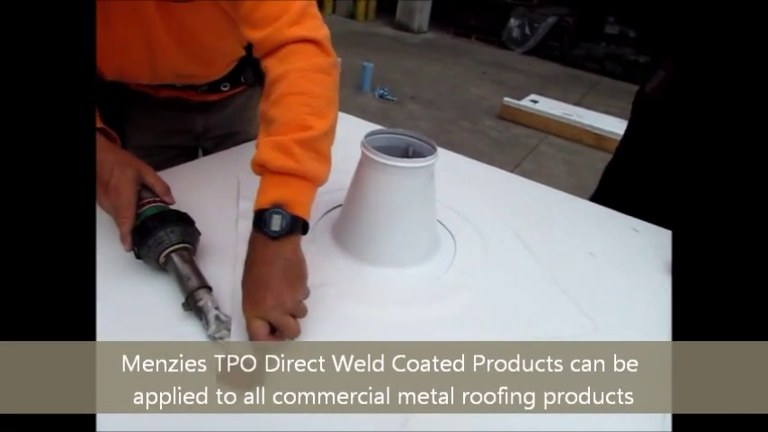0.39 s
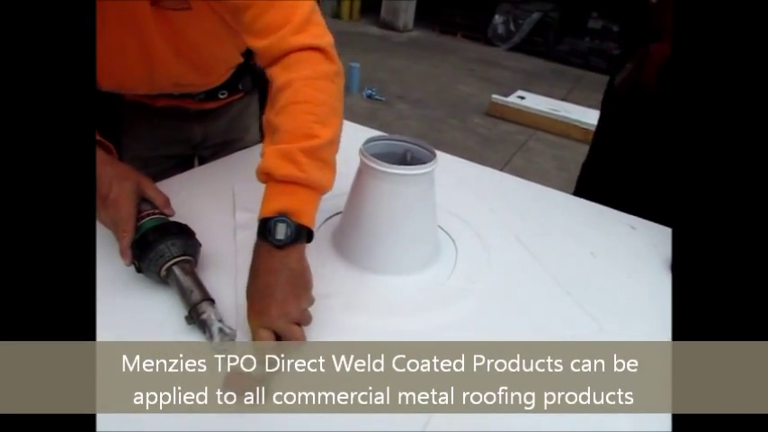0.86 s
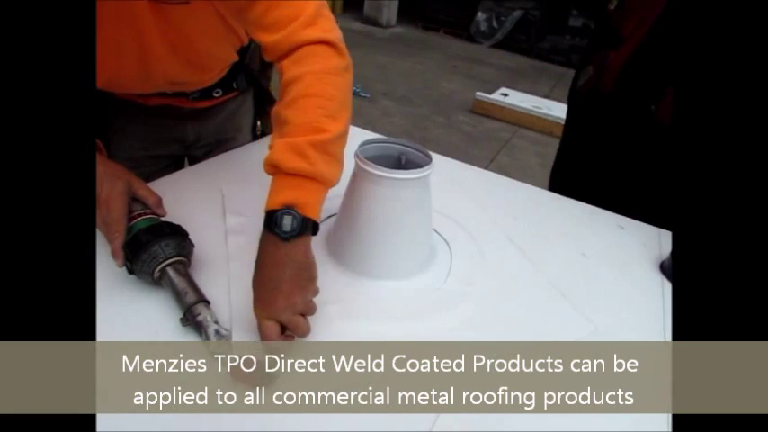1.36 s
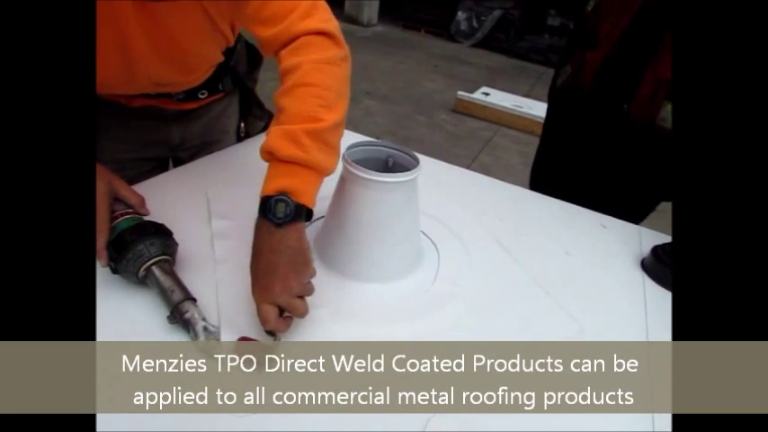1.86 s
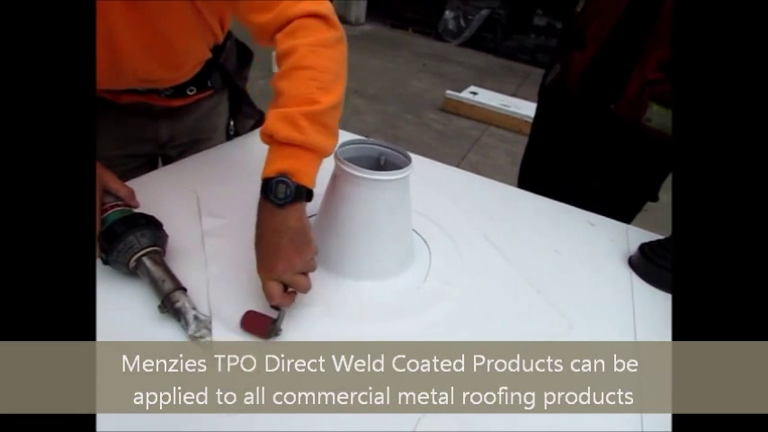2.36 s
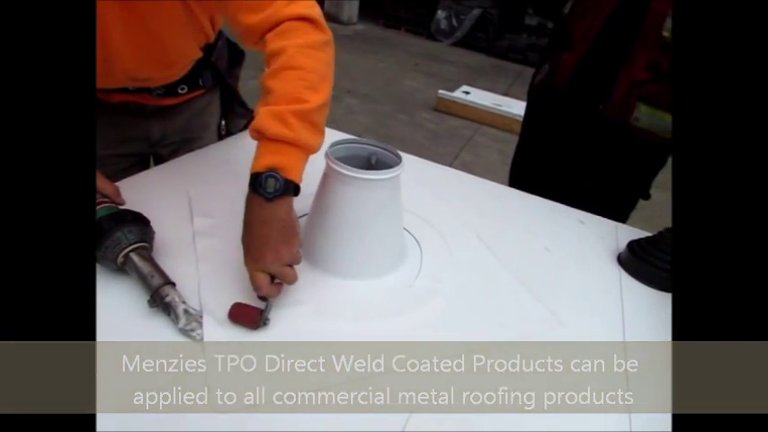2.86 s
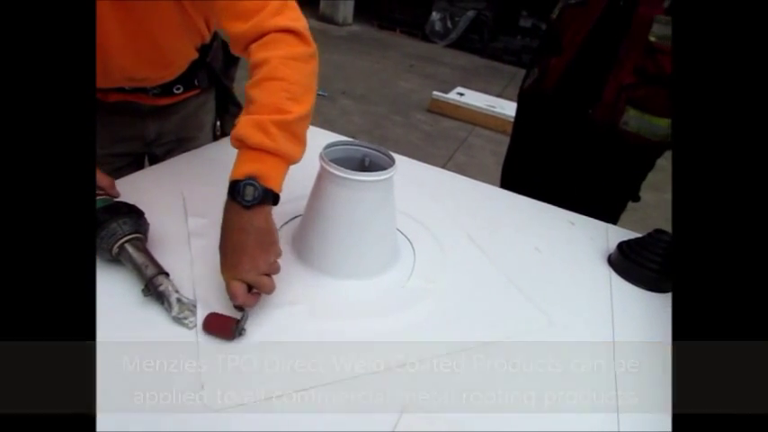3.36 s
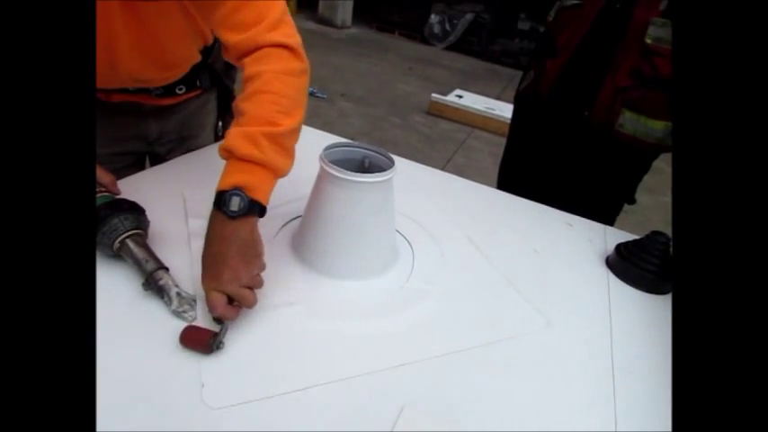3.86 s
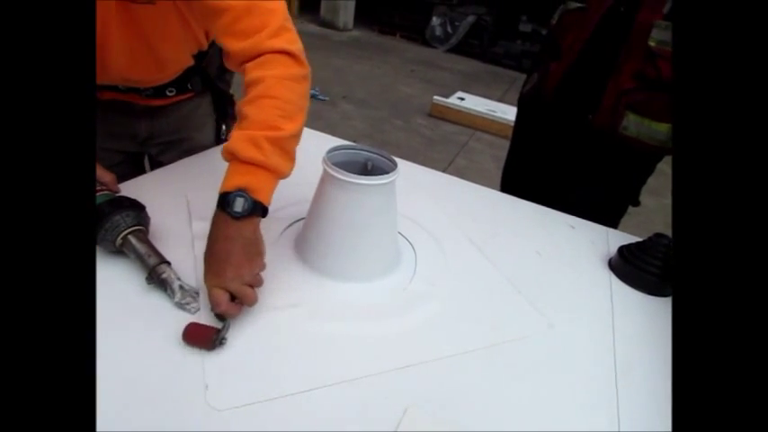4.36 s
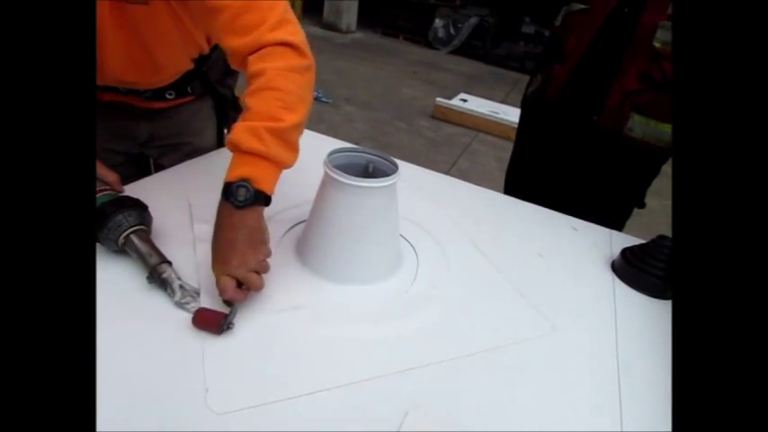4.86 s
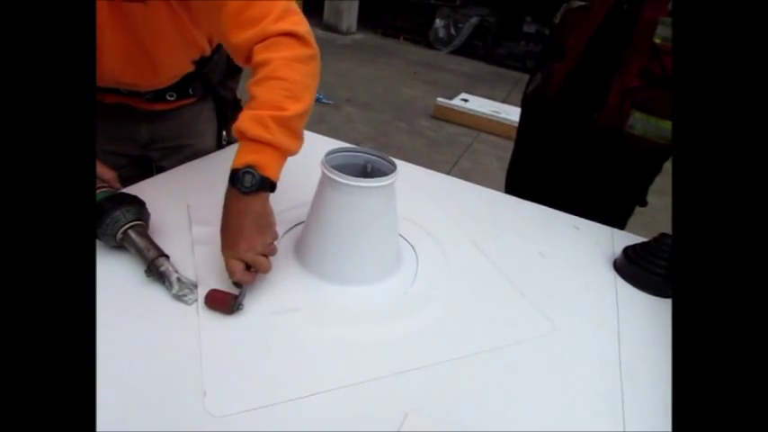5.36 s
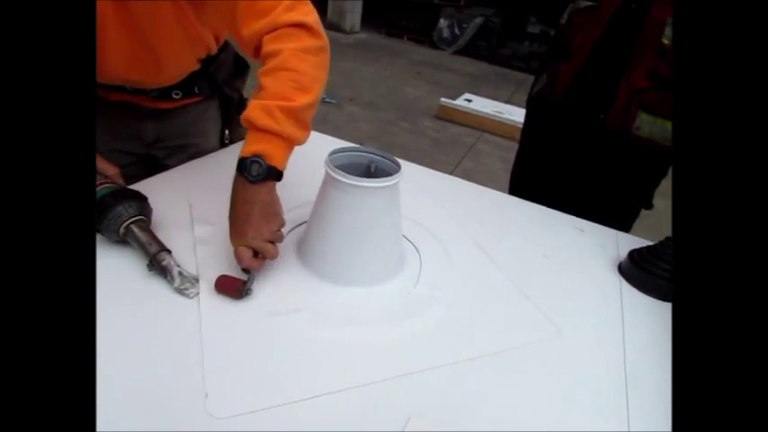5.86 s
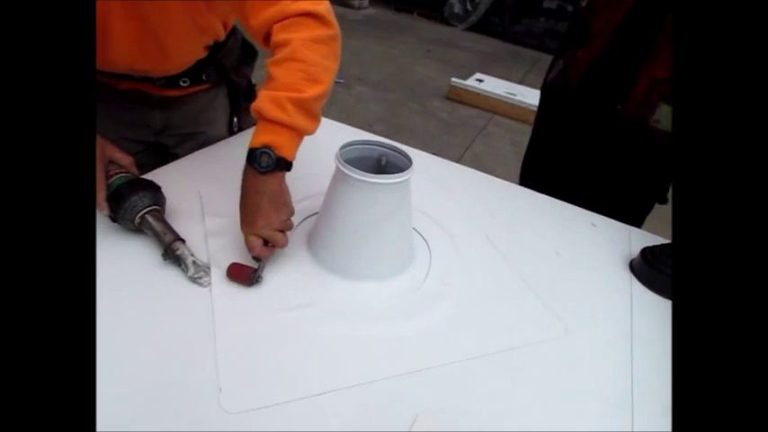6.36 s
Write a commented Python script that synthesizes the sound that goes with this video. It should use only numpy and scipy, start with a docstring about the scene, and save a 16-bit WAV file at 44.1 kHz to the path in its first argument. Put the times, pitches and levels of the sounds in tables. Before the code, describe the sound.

A steady jet of hot air hisses brightly at close range, coloured by its nozzle and flickering in width between left and right. Small irregular puffs of duller air swell and fall. Underneath sit a thin, gently sagging motor hum, low yard rumble and a far-off throbbing engine, strongest just after the middle, then fading.

```python
"""Hot-air welder on roofing membrane

A hand-held welder blows close to two microphone ports: noise shaped by nozzle resonances makes its hiss,
a duller noise its fan rush, and sines its motor, which sags each time the heater cuts in.
Noise bands and a throbbing low tone carry a distant vehicle past, over rumble and faint hums of the yard."""
import sys
import numpy as np
from scipy import signal
from scipy.io import wavfile
from scipy.ndimage import uniform_filter1d

SR = 44100
rng = np.random.default_rng(int(sys.argv[2]) if len(sys.argv) > 2 else 0)


def invert_db(x):
    """Field ratio 10**(x/20) for x, a level in decibels (scalar or array-like)."""
    u = np.asarray(x, float) / 20
    return 10 ** u


def dump(signal):
    """Clip the signal to [-1, 1] and save it as 16-bit WAV at the path in sys.argv[1]."""
    limited = np.clip(np.atleast_2d(signal).T, -1, 1)
    pcm = np.round(limited * 32767).astype(np.int16)
    wavfile.write(sys.argv[1], SR, pcm)


N = 297234  # length in samples


def evened(x):
    """Scales a signal to rms 1."""
    return x / np.sqrt(np.mean(x ** 2) + 1e-20)


def read(points, hz):
    """Reads every column of a table on a log-frequency axis."""
    f, *columns = np.transpose(points)
    return [np.interp(np.log(hz + 1), np.log(f + 1), c) for c in columns]


def follow(rows, t):
    """Reads every column of a table along time."""
    s, *columns = np.transpose(rows)
    return [np.interp(t, s, c) for c in columns]


def hump(hz, centre_hz, width_hz):
    """Power of a steep resonance, down to a quarter at half a width from its centre."""
    return 1 / (1 + (2 * (hz - centre_hz) / width_hz) ** 2) ** 2


def shaped(colour_power):
    """Scales a spectrum to total power 1."""
    return colour_power / colour_power.sum()


def swell(t, centre_s, length_s):
    """A smooth bump of height 1."""
    return np.exp(-(2 * (t - centre_s) / length_s) ** 2)


def wander(top_hz):
    """Slow random drift of rms 1, from sines between 0.3 Hz and top_hz."""
    t = np.arange(0, N + 64, 64) / SR
    rates_hz = np.geomspace(.3, top_hz, 24)
    slow = sum(np.sin(2 * np.pi * (f * t + rng.random())) / np.sqrt(f) for f in rates_hz)
    return np.interp(np.arange(N) / SR, t, evened(slow))


def wander_at(t, top_hz):
    """The same drift, read at the times of short-time spectra."""
    return np.interp(t, np.arange(N) / SR, wander(top_hz))


def spectra_grid(size):
    """Times and frequencies of short-time spectra."""
    return np.arange(4 * N // size + 5) * size / 4 / SR, np.fft.rfftfreq(size, 1 / SR)[:, None]


# Moments when every frequency opens out in stereo. Each row: start in seconds, length in seconds.
WIDE_MOMENTS = [(1.511, 0.086), (1.848, 0.12), (2.538, 0.1), (2.916, 0.12), (3.23, 0.15), (3.862, 0.17),
                (4.25, 0.11), (4.842, 0.106), (5.446, 0.11), (6.096, 0.13), (6.662, 0.066)]
# Flickering stereo patches between those moments.
# Each row: frequency in Hz, share of patches that are wide (0 to 1).
FLICKER = [(4300, 1), (4700, .15), (8000, .1), (8600, .3), (9100, .12), (9600, .5), (11200, .5),
           (12000, .33), (13500, .2)]


def wide_treble(t, hz):
    """True where left and right differ, false where the treble narrows to one sound in both; patches flicker in
    time and pitch."""
    draws = rng.random((len(t), len(hz))).T
    row = (hz[:, 0] // 345).astype(int)  # patches 345 Hz tall
    column = (t / .06 + draws[row, -1:]).astype(int)  # 0.06 s long, each row offset by chance
    wide = draws[row[:, None], column] < read(FLICKER, hz)[0]
    for start_s, length_s in WIDE_MOMENTS:
        wide |= (t > start_s) & (t < start_s + length_s)
    return wide


# How noise differs between the two ports where it is wide.
# Each row: frequency in Hz, likeness (0 to 1), lead of the left in radians, left minus right in dB.
PORTS = [(60, 0.97, 0.2, -2), (300, 1, 0.03, -.5), (656, 0.93, 0.3, 0), (1100, 0.96, 0.03, .5),
         (1770, 0.95, 0.05, -0.5), (2000, 0.79, .5, -.5), (2700, 0.6, 1.07, -2), (2920, 0.6, 1.7, 3),
         (3420, 0.64, 1.3, 6.5), (4000, 0.47, .9, 7), (4250, 0.17, 0.6, 3.5), (4470, 0.73, -0.4, 3.5),
         (5000, .85, -0.25, 0), (6300, 0.8, 1, -1), (8000, .6, 1.33, 0.5), (9500, .64, 1.85, 3.5),
         (12000, 0.56, 2, 3.5), (15000, 0.3, 2.6, -1)]


def noise(power, t, hz, patchy_db):
    """Random spectra of given power with drifting patches, as the two ports catch them."""
    a, b, c, d, patches = rng.standard_normal((len(t), len(hz), 5)).T
    patches = evened(uniform_filter1d(uniform_filter1d(patches, 6, 0), 16, 1))
    same, lead, left_db = read(PORTS, hz)
    same = np.clip(same, 0, 1)
    left, wide = a + 1j * b, wide_treble(t, hz)
    own = c + 1j * d  # what the right port hears alone
    apart = same * np.exp(-1j * lead) * left + np.sqrt(1 - same ** 2) * own
    tilt = invert_db(wide * left_db / 2)
    pair = np.array([left * tilt, np.where(wide, apart, left) / tilt])
    z = pair * np.sqrt(power) * invert_db(patchy_db * patches)
    size = 2 * len(hz) - 2
    return signal.istft(z, nperseg=size, noverlap=3 * size // 4)[1][:, :N] / np.sqrt(4 / 3)


# Broad hiss under the nozzle rings. Each row: frequency in Hz, relative level in dB.
JET_COLOUR = [(3500, -22), (4200, -14), (5000, -8), (8000, -7), (12500, -7), (13500, -11), (15050, -22),
              (15250, -27), (15450, -52)]
# Nozzle resonances. Each row: centre in Hz, width in Hz, level in dB before the common 0.5 dB boost.
NOZZLE = [(4470, 610, -11), (5370, 800, -7), (6630, 1330, -5), (7200, 510, -12), (9120, 1000, -0.5),
          (10620, 1200, -5.5), (11460, 890, -6.5)]
# What each nozzle ring gains at full tilt, in dB, one value per ring.
RING_TILT_DB = [2, -4.2, 1, -6, 1, 2.5, -5]
# Extra share of the lift that each nozzle ring takes, one value per ring.
RING_LIFT = [0.24, 0.17, .1, 0.076, 0.021, 0.16, -.1]


def jet_power(t, hz, near_db, tilt, lift_db):
    """Turbulent jet hissing through its nozzle: broad noise plus rings that change with tilt and lift."""
    jet = invert_db(2 * read(JET_COLOUR, hz)[0]) * np.ones(len(t))
    for (f, width, db), tilt_db, share in zip(NOZZLE, RING_TILT_DB, RING_LIFT):
        ring_db = db + 0.5 + tilt_db * tilt + share * lift_db
        jet = jet + hump(hz, f, width) * invert_db(2 * ring_db)
    jet_db = -20.5 + near_db + 0.54 * lift_db  # the jet takes only part of the lift
    return jet / jet.sum(0) * invert_db(2 * jet_db)


# Dull air rush of the fan. Each row: frequency in Hz, relative level in dB.
RUSH_COLOUR = [(900, -23), (1900, -3), (2200, 0), (2700, -2), (3300, 1.5), (3900, 1.5), (4300, -19),
               (6000, -49)]


def rush_power(t, hz, near_db, tilt, lift_db):
    """Fan rush: duller noise that takes the whole lift and shifts a little with the loose flap."""
    flap_db = 0.72 * wander_at(t, top_hz=9.5)
    rush_db = -36.5 + near_db + lift_db - 1.3 * tilt + flap_db
    return shaped(invert_db(2 * read(RUSH_COLOUR, hz)[0])) * invert_db(2 * rush_db)


# Each roller stroke lets the flap lift for a moment and more air sound escapes.
# Each row: centre in seconds, length in seconds, rise in dB.
LIFTS = [(0.128, 0.35, 2), (0.523, 0.13, 2.5), (0.985, 0.26, 4), (1.192, 0.21, 4.5), (1.48, 0.29, 5.5),
         (1.735, 0.3, 5), (2.046, 0.3, 6.5), (2.356, 0.2, 5), (2.54, 0.12, 3.5), (2.775, 0.18, 4),
         (3.01, 0.15, 3), (3.2, 0.14, 1.5), (3.418, 0.11, 3), (3.612, 0.21, 4), (3.837, .2, 1.5),
         (4.09, 0.14, 4), (4.512, 0.19, 4), (4.697, 0.16, 5), (5.1, 0.22, 2.5), (5.426, 0.27, 2.5),
         (5.813, .2, 2), (5.984, .2, 3), (6.32, 0.29, 5), (6.72, 0.17, 0.5)]
# How the hand holds the welder. Each row: time in seconds, nearness in dB, tilt (-1 to 1).
HAND = [(0, 1, .5), (.5, 0.5, -0.072), (.85, -1, 0.48), (1.4, -1.5, -0.4), (2.1, -1.9, 0.29),
        (2.5, -0.5, -0.5), (2.9, 0.7, 0.16), (3.5, 0, -0.81), (4.2, 0.5, -0.63), (4.8, .3, -0.36),
        (5.3, 0.5, 1), (5.8, 0.6, 0.28), (6.3, -1.1, -0.023), (6.74, 2.9, -0.065)]


def air():
    """Jet and fan rush move together with the hand, the lifting flap and small gusts."""
    t, hz = spectra_grid(size=512)
    lift_db = sum(db * swell(t, s, length) for s, length, db in LIFTS)
    near_db, tilt = follow(HAND, t)
    power = jet_power(t, hz, near_db, tilt, lift_db) + rush_power(t, hz, near_db, tilt, lift_db)
    gusts_db = .5 * wander_at(t, top_hz=60.5)
    return noise(power * invert_db(2 * gusts_db), t, hz, patchy_db=.5)


# Low rumble of the yard. Each row: frequency in Hz, relative level in dB.
RUMBLE = [(15, -18), (30, -2), (45, -2.5), (90, -8), (160, -5), (260, -6.5), (420, -15), (1350, -9),
          (2500, -24.5)]


def rumble_power(hz, surge_db):
    """Steady broad rumble that rises slightly with the vehicle's surge."""
    return shaped(invert_db(2 * read(RUMBLE, hz)[0])) * invert_db(2 * (-39 + 0.18 * surge_db))


# Air ringing in the welder's body. Each row: centre in Hz, width in Hz, level in dB.
HOUSING = [(644, 57, -48.5), (834, 27, -48.5)]


def housing_power(hz):
    """The welder's hollow body: narrow steady resonances of noise."""
    return sum(shaped(hump(hz, f, width)) * invert_db(2 * db) for f, width, db in HOUSING)


# Traffic noise: exhaust boom, body, tyre roar, its brighter edge and tyre hiss.
# Each row: centre in Hz, width in Hz, base level in dB, share of nearness, drift in dB per second.
TRAFFIC_BANDS = [(380, 590, -49.5, 0.8, -1), (598, 200, -40.5, 0.51, -1.13), (944, 550, -39.5, 1.1, 0.5),
                 (1644, 440, -40.5, 0.76, 1.1), (3080, 2900, -41.5, 1.2, -2.1)]
# The vehicle draws near, surges and moves off. Each row: time in seconds, nearness in dB.
PASS = [(0, 0), (.7, -6.5), (1.5, -2), (2.2, -1.5), (2.75, 2.5), (3.15, -2.5), (3.7, .3), (4.05, 5),
        (4.4, 4), (4.6, -0.5), (4.85, -2.5), (5.3, -0.5), (6.1, -4.5), (6.74, -5.5)]


def traffic_power(t, hz, surge_db):
    """Passing vehicle: noise bands follow its nearness, each in its own measure."""
    near_db = follow(PASS, t)[0]
    power = 0
    for k, (f, width, db, by_near, drift_db) in enumerate(TRAFFIC_BANDS):
        band_db = db + by_near * near_db + drift_db * (t - t.mean())
        band_db = band_db + (k == 0) * surge_db  # only the exhaust boom takes the full surge
        power = power + shaped(hump(hz, f, width)) * invert_db(2 * band_db)
    return power


def yard():
    """Rumble, the welder's hollow body and traffic as one bed of noise."""
    t, hz = spectra_grid(size=2048)
    surge_db = 8.5 * swell(t, centre_s=4, length_s=0.32)  # the exhaust boom swells once
    power = rumble_power(hz, surge_db) + housing_power(hz) + traffic_power(t, hz, surge_db)
    return noise(power, t, hz, patchy_db=1.5)


def tone(hz, db):
    """A sine that follows curves of pitch and rms level."""
    turns = np.cumsum(hz * np.ones(N)) / SR + rng.random()
    return np.sqrt(2) * invert_db(db) * np.sin(2 * np.pi * turns)


MOTOR_HZ, SAG_HZ = 253.5, 3.2  # top pitch and deepest sag
HEATER_S, HEATER_START_S = .585, 0.028  # cycle length and first switch-on
HEATER_ON = 0.6  # share of the cycle
# Level of the motor's main tone. Each row: time in seconds, level in dB.
MOTOR_LEVEL = [(0.0, -37.5), (1.01, -42.5), (1.12, -40.5), (3.25, -43.5), (4.35, -40), (4.54, -42.5),
               (6.12, -39), (6.38, -42.5), (6.63, -37.5), (6.74, -42)]
# Higher shaft orders. Each row: multiple of the main tone, mean level in dB re the main tone's mean.
SHAFT = [(2, -22), (6, -11), (8, -12.5), (9, -20)]


def motor():
    """Shaft orders; the speed sinks while the heater draws current and climbs back when it stops."""
    t = np.arange(N) / SR
    cycle = (t - HEATER_START_S) / HEATER_S % 1
    sag = np.minimum(cycle / HEATER_ON, (1 - cycle) / (1 - HEATER_ON))
    hz = MOTOR_HZ - SAG_HZ * sag
    db = follow(MOTOR_LEVEL, t)[0]
    orders = sum(tone(round(k) * hz, db.mean() + d + 3.8 * wander(top_hz=8.1)) for k, d in SHAFT)
    return tone(hz, db) + orders


# Level of the vehicle's engine tone. Each row: time in seconds, level in dB.
ENGINE_LEVEL = [(0, -47), (.2, -40), (.5, -47), (.9, -44), (1.55, -38.5), (2.1, -44.5), (2.55, -43),
                (2.85, -50), (3.5, -45), (4.3, -42.5), (5.0, -45), (5.4, -47), (5.8, -60), (6.74, -67)]


def engine():
    """The vehicle's firing tone climbs slowly and throbs against a weaker neighbour."""
    t = np.arange(N) / SR
    hz = 69.9 + 0.49 * t  # climb in Hz per second
    db = follow(ENGINE_LEVEL, t)[0]
    neighbour_db = np.minimum(db - 7.0, -53.) + 2.5 * wander(top_hz=2.66)
    return tone(hz, db) + tone(1.075 * hz, neighbour_db)


# Faint fuzzy tones around the engine. Each row: centre pitch in Hz, mean level in dB.
HUMS = [(59, -58), (119, -58), (137, -71)]


def hums():
    """Yard hums: sines made fuzzy by small wanderings of pitch and level."""
    return sum(tone(hz * (1 + 0.0034 * wander(top_hz=5.2)), db + 2.4 * wander(top_hz=5.8))
               for hz, db in HUMS)


def ports(x, left_db, count):
    """One sound at two ports; the left hears it count samples early and left_db louder."""
    return np.array([np.roll(x, -count) * invert_db(left_db / 2), x / invert_db(left_db / 2)])


def scene():
    """Welder close by, yard behind."""
    noises = air() + yard()
    low_tones = engine() + hums()
    return noises + ports(motor(), left_db=-1.3, count=3) + ports(low_tones, left_db=-2.5, count=4)


def band_limit(x):
    """A steep low-pass at the top of the band."""
    return signal.sosfilt(signal.butter(12, 15750, fs=SR, output="sos"), x)


def record(dry):
    """Passes on the finished mix of both ports."""
    return band_limit(dry)


dry = scene()
out = record(dry)
dump(out)
```